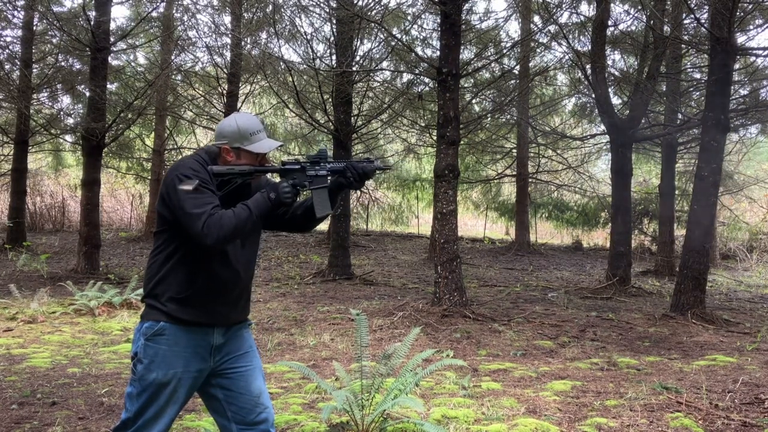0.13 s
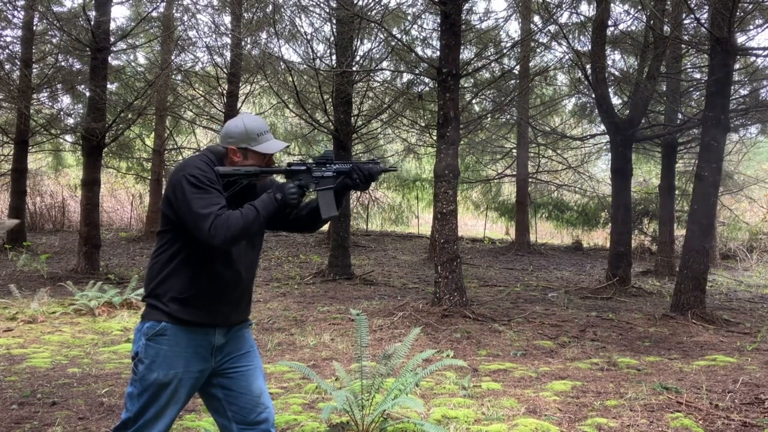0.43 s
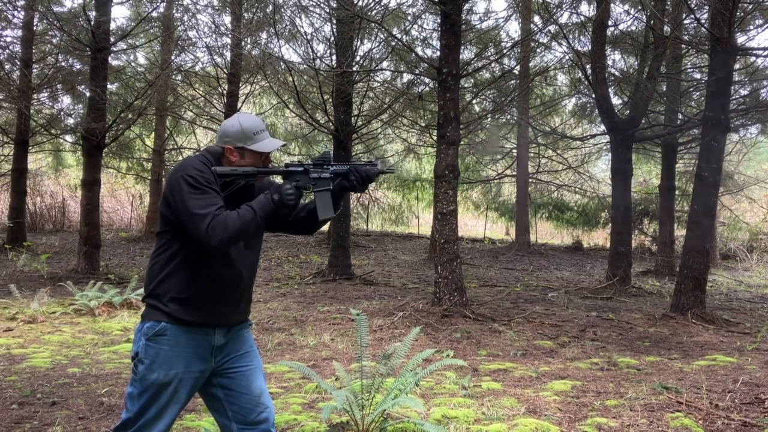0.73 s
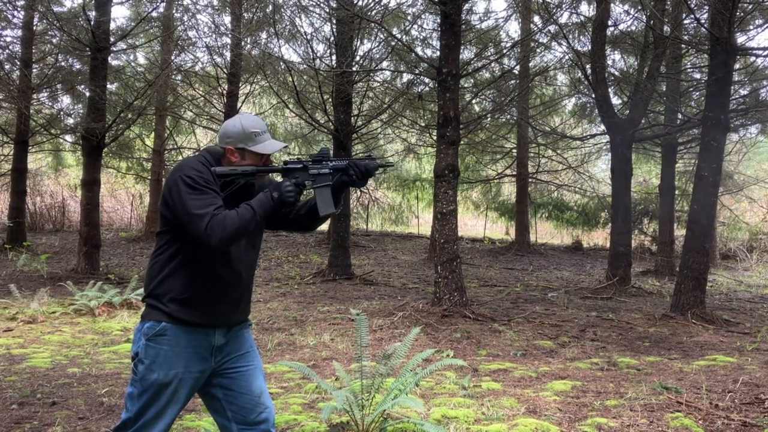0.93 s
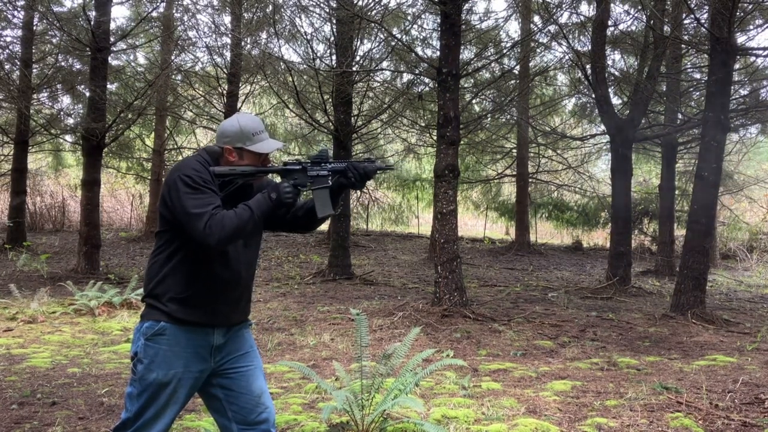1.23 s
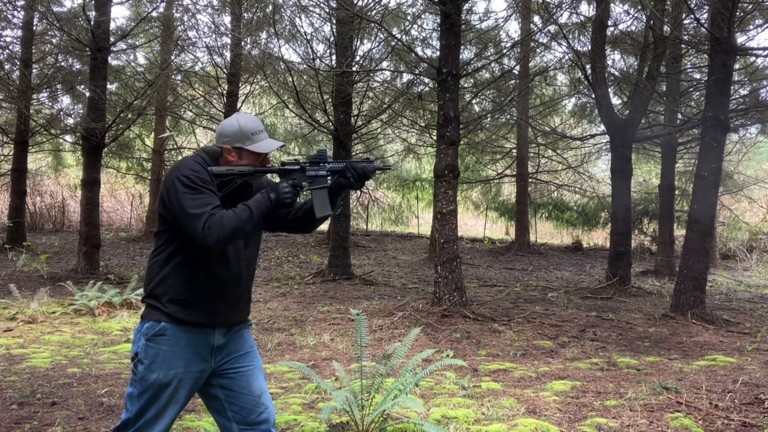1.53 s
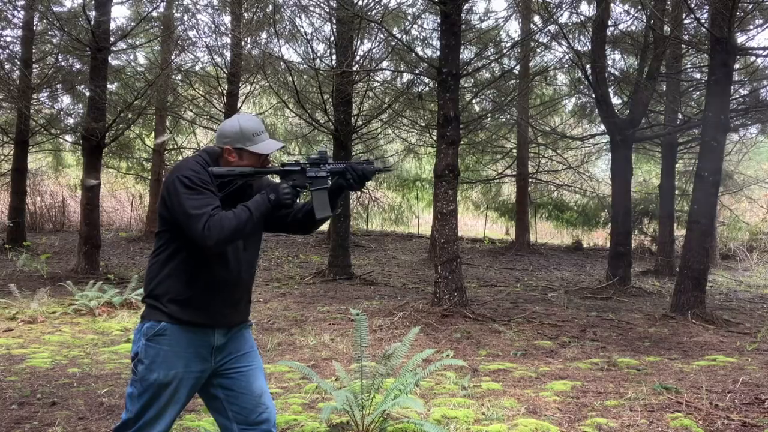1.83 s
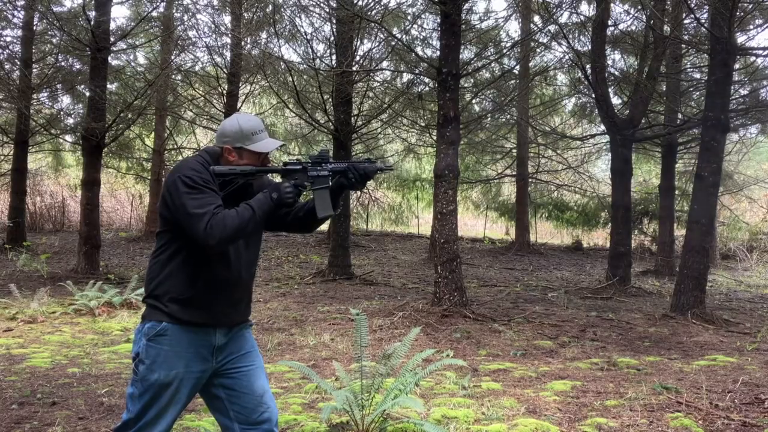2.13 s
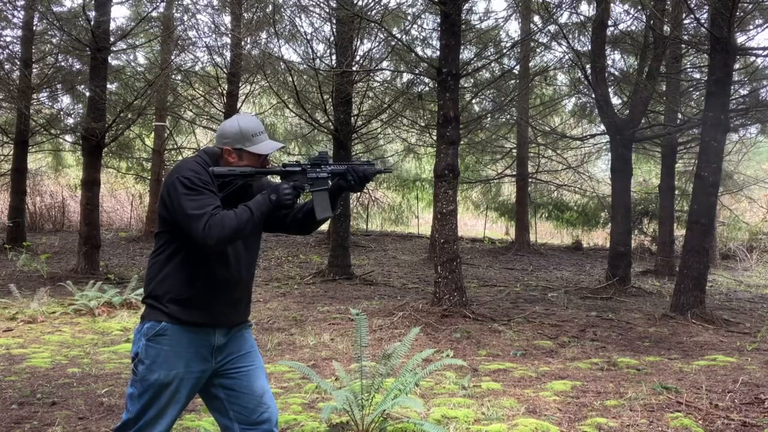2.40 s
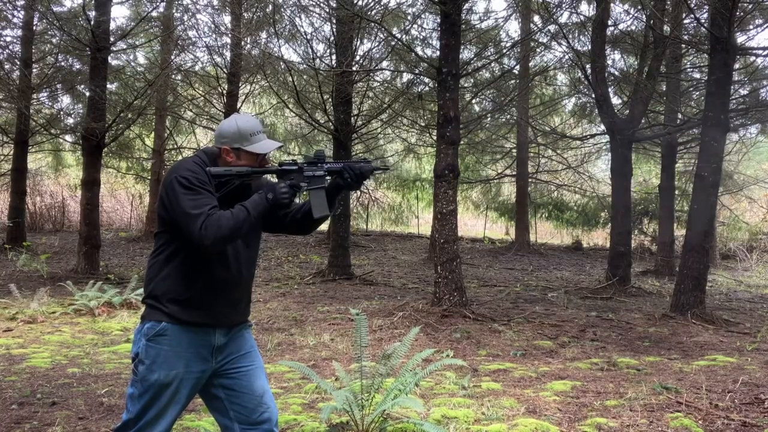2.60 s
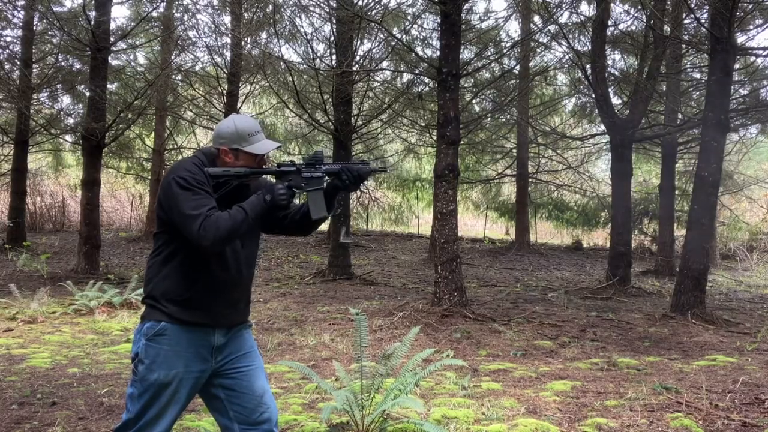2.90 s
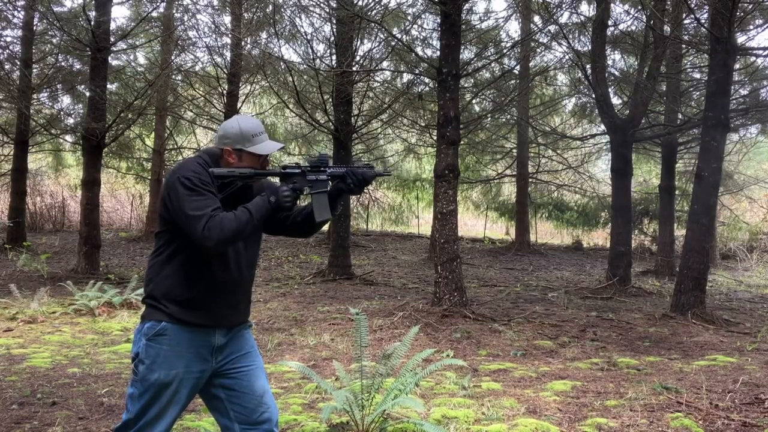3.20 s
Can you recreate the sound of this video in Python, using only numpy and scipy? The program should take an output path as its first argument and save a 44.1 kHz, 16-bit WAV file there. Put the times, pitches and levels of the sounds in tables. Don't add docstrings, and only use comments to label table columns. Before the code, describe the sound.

A suppressed short rifle fires rapidly from the very start to about 3.0 seconds, roughly twenty shots spaced 0.1 to 0.25 seconds apart. Each is a sharp but muffled pop with hissing gas, a brief hollow ring and varying low thump. Ground and trunks slap back quick echoes; diffuse forest reverberation fills the gaps and fades after the last shot into faint still air. Close stereo, a few metres away.

```python
import sys
import numpy as np
from scipy import signal
from scipy.fft import rfft, irfft
from scipy.io import wavfile
from scipy.ndimage import uniform_filter1d

SR = 44100
rng = np.random.default_rng(int(sys.argv[2]) if len(sys.argv) > 2 else 0)


def makeup_ratio(level_db):
    decades = np.asarray(level_db, float) / 20
    return 10 ** decades


def master(y):
    cut = np.clip(np.atleast_2d(y).T, -1, 1)
    pcm = np.round(cut * 32767)
    wavfile.write(sys.argv[1], SR, pcm.astype(np.int16))


N = 147735
LEAD_S, SPAN_S = 0.012, 1.2
BY_BLAST, BY_RING, BY_THUMP, BY_BODY = 1, 2, 3, 4
HUM_LAG = 7

# pitch_hz, share [0-1]
REPEATED = [(60, 1), (300, 0.87), (1200, 0.42), (3000, 0.17), (8000, 0.067)]


def at_hz(points, hz, col=1):
    points = np.array(points, float)
    return np.interp(np.log(hz), np.log(points[:, 0]), points[:, col])


def delay(x, samples):
    turn = np.exp(-2j * np.pi * np.fft.rfftfreq(len(x)) * samples)
    return irfft(rfft(x) * turn, len(x))


def pair(x, lag):
    return np.array([delay(x, lag), x])


def stereo_mix(alike):
    mid, side = np.sqrt(1 + alike), np.sqrt(1 - alike)
    return np.array([[mid, side], [mid, -side]])


def since(ms):
    return np.arange(int(SPAN_S * SR)) / SR - LEAD_S - ms / 1000


def swell(t, attack_ms, release_ms):
    up = np.clip(t * 1000 / attack_ms, 0, 1)
    down = np.clip((t * 1000 - attack_ms) / release_ms, 0, 1)
    return np.sin(np.pi / 2 * up) ** 2 * np.cos(np.pi / 2 * down) ** 2


def bands(low_hz, high_hz):
    out = []
    for edge in low_hz * 2 ** np.arange(0, np.log2(high_hz / low_hz), 0.5):
        upper = min(edge * 2 ** 0.5, 0.45 * SR)
        out.append((edge * 2 ** 0.25, signal.butter(2, [edge, upper], "band", fs=SR, output="sos")))
    return out


def bursts(rows, sag_per_s=0.0):
    out = 0
    for start_ms, hz, attack_ms, release_ms, db in rows:
        t = np.clip(since(start_ms), 0, 1)
        tone = np.sin(2 * np.pi * hz * t * (1 - sag_per_s * t / 2))
        out = out + makeup_ratio(db) * swell(t, attack_ms, release_ms) * tone
    return out


def fire(shape, col, twice=False):
    # start_s, blast_db, ring_db, thump_db, body_db
    shots = [(-0.104, 6.5, -12, -3.0, 13), (0.0358, -0.1, 1.8, 14.5, 10), (0.243, -0.3, 2.5, 5.9, 7),
             (0.4304, 0, 2.3, 7.5, 7.5), (0.5303, -0.8, 0, 8.5, 5.5), (0.7245, -1, 0.7, -2.0, -12),
             (0.8633, -1.3, 0.3, 5, -1.5), (0.977, -1.54, 1.8, 6.5, 4), (1.164, -0.8, 1.2, -5, 6),
             (1.3073, -1.3, 0, 3, 7), (1.4804, -1.7, 0.2, 0.5, 3.5), (1.5826, -1, 1.5, -2.5, -25),
             (1.7793, -1.45, 0.3, -4.0, -29), (2.0112, -1.5, -8.1, -2.9, -10), (2.1584, -1, 0.3, -3, -11),
             (2.329, -1, 0, 4, 5), (2.4419, -1, 0.8, 4, 6.5), (2.5553, -1, 3, 1.5, 5),
             (2.6598, -1, 3.5, 1.5, 7), (2.752, -1.2, 2, -0.5, 2.5), (2.8661, -1, 1, 5, -15),
             (2.9977, -0.86, -8.9, 3, -15)]
    rows = np.array(shots)
    clicks = np.zeros(N + SR)
    clicks[np.round((rows[:, 0] + 1 - LEAD_S) * SR).astype(int)] = makeup_ratio(rows[:, col] * (1 + twice))
    clicks = clicks * np.ones(shape.shape[:-1] + (1,))
    return signal.fftconvolve(clicks, shape, axes=-1)[..., SR:SR + N]


def air():
    return makeup_ratio(-78) * signal.lfilter([1], [1, -0.97], rng.standard_normal((2, N)))


def forest():
    # pitch_hz, early_db, early_t60_s, late_db, late_t60_s
    decay = [(60, -52, 0.098, -64, .8), (128, -39.5, 0.43, -64, 2.25), (223, -29.5, 0.1, -49, 1.7),
             (320, -36, 0.14, -47, 1.36), (635, -26.5, 0.3, -38, 0.73), (1330, -38.5, 0.42, -48, 1.04),
             (2740, -30.5, 0.43, -46, 1.6), (7560, -34.5, 0.41, -44, 0.77), (14700, -44.5, 0.46, -71, .4)]
    # pitch_hz, correlation [-1 to 1]
    likeness = [(60, 1), (180, 0.5), (550, -0.0032), (1650, 0.15), (4970, -0.41), (15000, 0.31)]
    rise_s = 0.011
    t = np.clip(since(0), 0, None)
    fresh = rng.standard_normal((2, 2, N))
    kept = rng.standard_normal((2, 2, len(t)))
    new, old = 0, np.zeros((5, 2, len(t)))
    for k, (hz, sos) in enumerate(bands(42.24, 17000)):
        early_db, early_s, late_db, late_s = (at_hz(decay, hz, col=c) for c in range(1, 5))
        power = makeup_ratio(early_db - 60 * t / early_s) ** 2 + makeup_ratio(late_db - 60 * t / late_s) ** 2
        power = power * (1 - np.exp(-(t / rise_s) ** 2)) * SR / hz
        mix, same = stereo_mix(at_hz(likeness, hz)), at_hz(REPEATED, hz)
        col = BY_THUMP if hz < 130 else BY_BODY if 240 < hz < 320 else BY_BLAST
        old[col] += np.sqrt(same * power) * (mix @ signal.sosfilt(sos, kept[k % 2]))
        envelope = np.sqrt((1 - same) * np.abs(fire(power, col=col, twice=True)))
        new = new + envelope * (mix @ signal.sosfilt(sos, fresh[k % 2]))
    repeated = sum(fire(old[col], col=col) for col in (BY_BLAST, BY_THUMP, BY_BODY))
    return makeup_ratio(1) * (new + repeated)


def rumble():
    hz, attack_ms, release_ms = 63, 16, 40
    noise = rng.standard_normal((3, N))
    sos = signal.butter(2, [hz / 1.42, hz * 1.77], "band", fs=SR, output="sos")
    low = signal.sosfilt(sos, noise[0] + 0.92 * noise[1:])
    push = fire(swell(since(2.3), attack_ms, release_ms), col=BY_THUMP)
    return makeup_ratio(-35) * low / low.std() * push


def far_echoes():
    # start_ms, pitch_hz, attack_ms, release_ms, level_db
    returns = [
        (94, 225, 10, 14, -32),
        (150, 215, 14, 25, -44),
    ]
    return pair(bursts(returns), HUM_LAG)


def thump():
    # start_ms, pitch_hz, attack_ms, release_ms, level_db
    heaves = [
        (5.09, 138.6, 14.8, 28, -31.5),
        (23.46, 101, 5, 13.6, -32.5),
        (53.5, 131, 8.4, 5, -43),
    ]
    return bursts(heaves[:1], sag_per_s=13.0) + bursts(heaves[1:])


def body():
    # start_ms, pitch_hz, attack_ms, release_ms, level_db
    knocks = [
        (.5, 267.4, 4.5, 8.9, -4.3),
        (17, 305, 2.5, 15, -17.5),
    ]
    return makeup_ratio(-16) * bursts(knocks)


def suppressor_ring():
    # start_ms, pitch_hz, attack_ms, release_ms, level_db
    rings = [
        (-.95, 372, 6.2, 6.5, -10),
        (7.2, 390, 3.5, 3, -17),
        (17.5, 330, 4, 4, -22),
        (47.7, 330, 4, 4.5, -27),
    ]
    return makeup_ratio(-1.5) * bursts(rings)


def hum():
    # start_ms, pitch_hz, attack_ms, release_ms, level_db
    tone = [
        (-.1, 655, 3, 12, 0),
    ]
    return makeup_ratio(-17.5) * pair(bursts(tone), HUM_LAG)


def slap():
    # start_ms, pitch_hz, attack_ms, release_ms, level_db
    echo = [
        (17.75, 860, 1.0, 7.5, 0),
    ]
    return makeup_ratio(-9) * pair(bursts(echo, sag_per_s=30.0), 15)


def gas():
    # start_ms, attack_ms, release_ms, level_db
    puffs = [
        (-7.5, 5.7, 5.7, -28),
        (-1.04, 0.71, 9.7, -16),
        (4, 3.6, 4.56, -19.5),
        (4.5, 5.3, 3, -27),
        (17.5, 2.8, 3.1, -23),
        (43.5, 1.2, 5, -29),
    ]
    # pitch_hz, level_db
    colour = [(350, -3), (800, -10), (1500, 6.5), (2600, 2.5), (5000, -3), (7500, 0), (11000, -3),
              (16000, -11.5)]
    crackle_db, crackle_samples = 2.2, 12
    shape = sum(makeup_ratio(db) * swell(since(ms), attack, release) for ms, attack, release, db in puffs)
    mix = stereo_mix(0.27)
    fresh = mix @ rng.standard_normal((2, 2, N))
    kept = mix @ rng.standard_normal((2, 2, len(shape)))
    new = old = 0
    for k, (hz, sos) in enumerate(bands(297.6, 17000)):
        gain, same = makeup_ratio(at_hz(colour, hz)), at_hz(REPEATED, hz)
        new = new + gain * np.sqrt(1 - same) * signal.sosfilt(sos, fresh[k % 2])
        old = old + gain * np.sqrt(same) * signal.sosfilt(sos, kept[k % 2])
    flicker = uniform_filter1d(rng.standard_normal(N), size=crackle_samples)
    new = new * makeup_ratio(crackle_db * flicker / flicker.std())
    scale = np.sqrt(np.mean(new ** 2) + np.mean(old ** 2))
    return (new * np.abs(fire(shape, col=BY_BLAST)) + fire(old * shape, col=BY_BLAST)) / scale


def pops():
    # start_ms, level_db, pitch_hz, left_lag [samples]
    arrivals = [(-.7, -12, 1000, 4), (2.55, -11, 950, 6), (4.6, -19, 1300, 1), (5.85, -17, 1100, 20),
                (7.3, -17, 1100, 3), (8.85, -13, 1000, 12), (12.7, -21, 1100, 14), (15.4, -19, 1000, 25),
                (29.3, -23, 1000, -20), (37.3, -21, 750, -18), (42.2, -22, 1400, 3), (49.6, -21, 650, 18)]
    out = 0
    for start_ms, db, hz, lag in arrivals:
        turn = since(start_ms) * hz
        swing = np.sin(2 * np.pi * turn) * (turn > 0) * (turn < 1)
        out = out - pair(makeup_ratio(db) * swing, lag)
    return makeup_ratio(3.48) * out


def scene():
    behind = air() + forest() + rumble()
    low = fire(thump(), col=BY_THUMP) + fire(body(), col=BY_BODY)
    rifle = pair(low + fire(suppressor_ring(), col=BY_RING), 11)
    blast = fire(far_echoes() + hum() + slap() + pops(), col=BY_BLAST)
    return behind + rifle + gas() + blast


def low_pass(x):
    return signal.sosfilt(signal.butter(12, 17120, fs=SR, output="sos"), x)


def record(dry):
    treble_hz, lag_samples = 6800, 9.6
    hz = np.maximum(np.fft.rfftfreq(N, 1 / SR), 1)
    share = 1 / (1 + (treble_hz / hz) ** 16)
    late = delay(dry[1], lag_samples)
    left = irfft(rfft(dry[0]) * (1 - share) - rfft(late) * share, N)
    wet = 1.174 * np.tanh(np.array([left, dry[1]]) / 1.256)
    wet = signal.sosfilt(signal.cheby2(10, 35, 16250, fs=SR, output="sos"), wet)
    wet = signal.sosfilt(signal.butter(2, 29, "high", fs=SR, output="sos"), wet)
    return low_pass(wet)


dry = scene()
out = record(dry)
master(out)
```